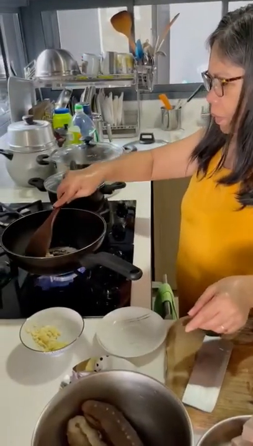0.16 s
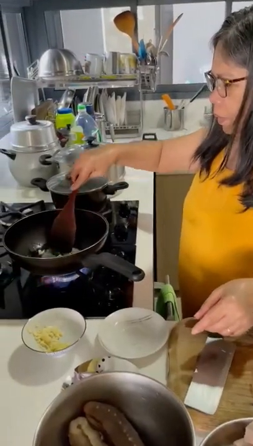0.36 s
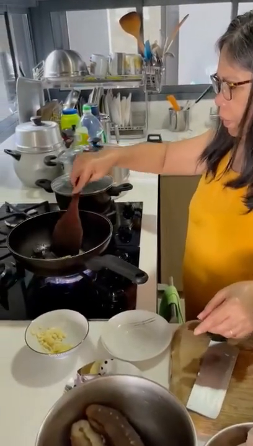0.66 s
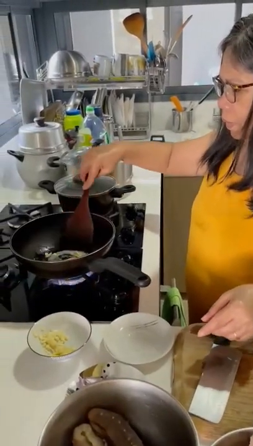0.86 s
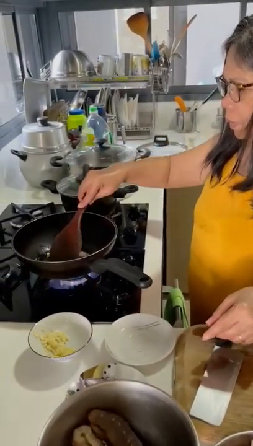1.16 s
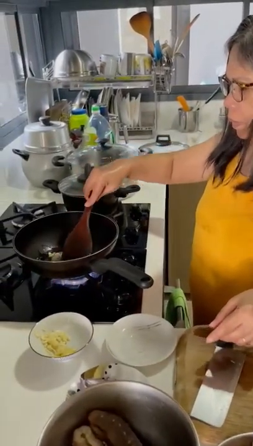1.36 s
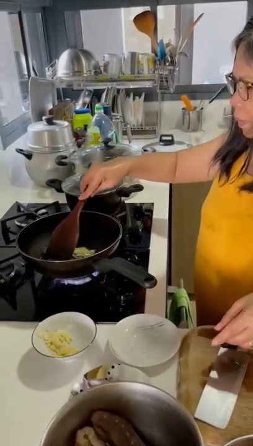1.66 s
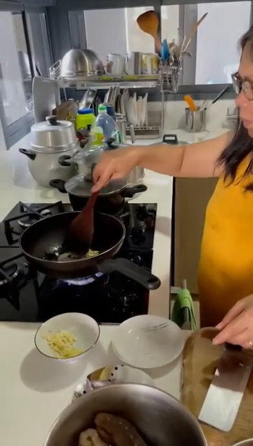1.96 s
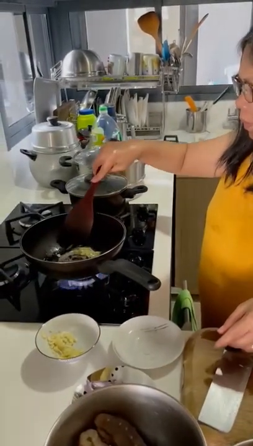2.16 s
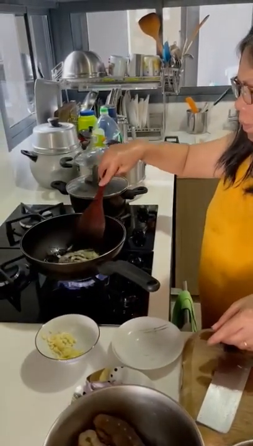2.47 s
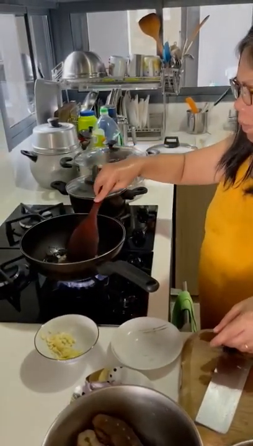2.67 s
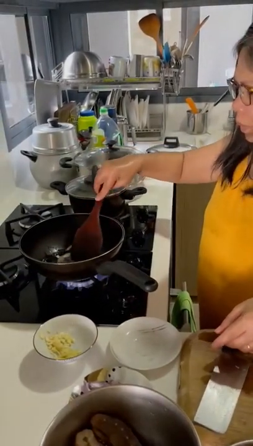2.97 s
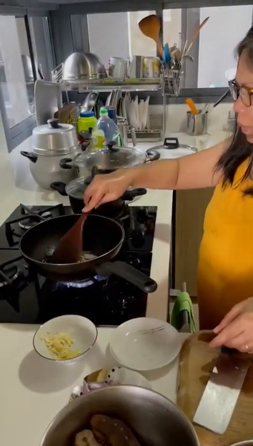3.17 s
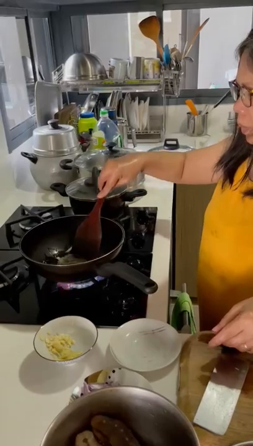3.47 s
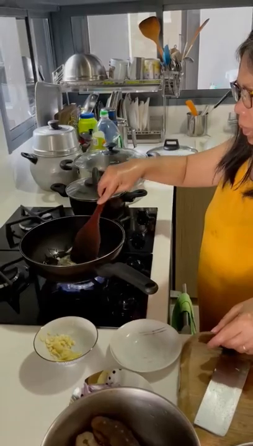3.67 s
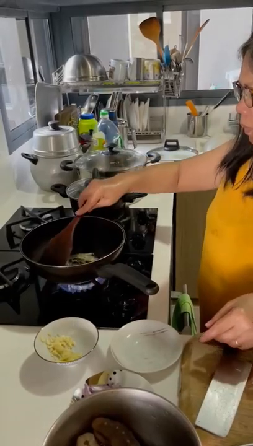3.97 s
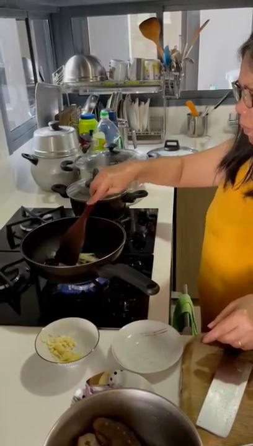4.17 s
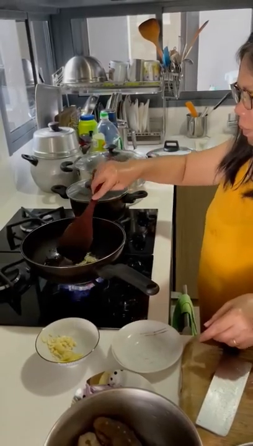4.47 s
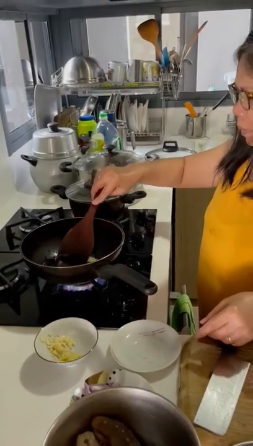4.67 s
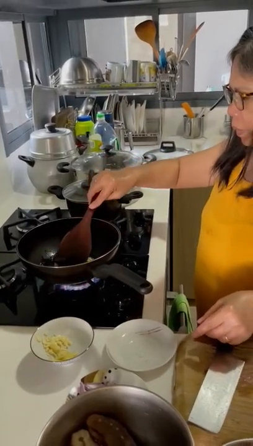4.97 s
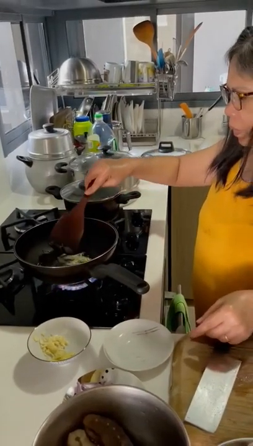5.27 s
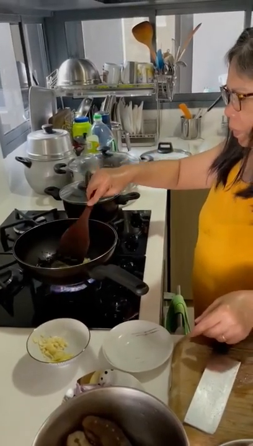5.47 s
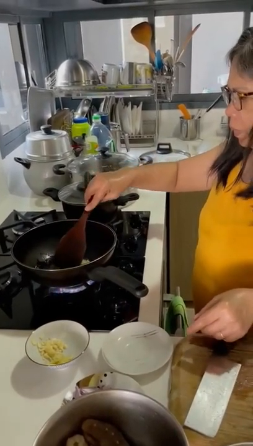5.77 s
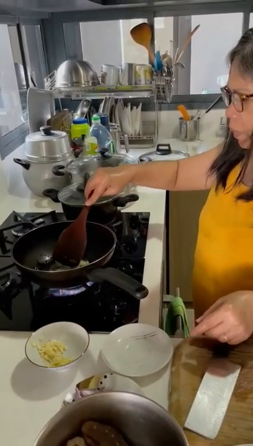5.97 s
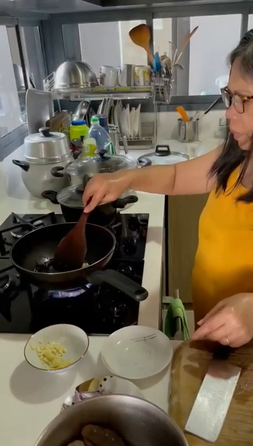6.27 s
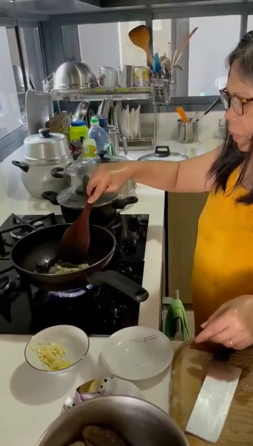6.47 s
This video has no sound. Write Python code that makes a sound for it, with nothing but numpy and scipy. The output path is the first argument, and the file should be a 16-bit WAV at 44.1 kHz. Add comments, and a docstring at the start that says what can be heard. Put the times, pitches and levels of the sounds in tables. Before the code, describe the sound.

In a hard-surfaced home kitchen, oil sizzles continuously, with fine bubbling pops and faint thin steam whistles. Irregular wooden clacks strike a pan, some sharp and light, others dull and heavy with a low thud on the grate. Brief rough scrapes follow the stirring. A quiet burner drone and moving air sit beneath, heard by a close two-channel microphone, ending on a short scrape as frying continues.

```python
"""Food fries gently in a pan on a gas hob from the start: bursting bubbles hiss, made of random clicks and noise.
A steady kitchen murmur and moving air on a nearby two-port microphone (coloured noise) lie under it.
Thin steam whistles soon join in. Then a wooden spatula knocks, taps and scrapes the pan, each contact
a noisy clack plus fading pan tones, with a short room echo. From 1.3 s dull low bumps come now and then.
The frying slowly grows louder and flares up at each turn of the food; a last scrape comes near the end."""
import sys
import numpy as np
from scipy import signal
from scipy.fft import rfft, irfft, next_fast_len
from scipy.io import wavfile

SR = 44100
rng = np.random.default_rng(int(sys.argv[2]) if len(sys.argv) > 2 else 0)


def dump(signal):
    """Clip the signal to [-1, 1] and save it as 16-bit WAV at the path in sys.argv[1]."""
    limited = np.clip(np.atleast_2d(signal).T, -1, 1)
    pcm = np.round(limited * 32767).astype(np.int16)
    wavfile.write(sys.argv[1], SR, pcm)


N = 291501
T = np.arange(N) / SR  # time of every sample (s)

# Turns of wet food onto hot metal. Each row: start in seconds, rise of the hiss in dB,
# drying time in seconds (the rise in dB shrinks to about a third in that time).
FOOD_TURNS = [(.03, 3, 0.12), (.37, 6.5, 0.43), (.8, 4, 0.11), (1.44, 4, 0.052), (1.7, 6.5, 0.065),
              (1.86, 4.5, 0.059), (2.14, 4.5, 0.22), (2.3, 4.5, 0.35), (2.8, 1, 0.067), (3.27, 0.5, 0.35),
              (3.53, 2, 0.6), (4.22, 3.5, .15), (5.36, 2.5, 0.068), (5.75, 2, .5), (6.42, 3, .3)]
# Colour of the bursting bubbles. Each row: frequency in Hz, level in dB per Hz.
OIL_COLOUR = [(200, -16), (600, -8.5), (1500, -8), (2400, -9), (3500, -7.3), (4150, -4.5), (4800, -9.5),
              (5700, -6), (7000, -5), (7900, -2.5), (9300, -2), (10600, .3), (11400, -1), (12500, -15)]
# Pan resonances that the bubbles keep ringing. Each row: frequency in Hz, width in Hz, level in dB.
OIL_RINGS = [(1315, 60, 0), (2315, 55, 8.5), (2450, 160, 7.5), (2790, 80, -1), (3100, 100, -3),
             (3870, 50, 3), (6095, 65, -2), (7774, 110, 2), (11130, 400, -5)]
# Level of that ringing against the hiss. Each row: time in seconds, level in dB.
RING_LEVEL = [(0, 4), (.5, 2), (1.12, 4), (1.4, 4.5), (1.58, 5), (2.03, 5.5), (2.17, 4), (2.3, 2),
              (2.55, 3), (3.05, 3), (3.25, 6), (3.6, 4), (4.3, -1), (4.45, 4), (4.68, 0.5), (5.2, 5),
              (5.7, 3), (6.61, 4.5)]
# Colour of the steady murmur of burner and fan. Each row: frequency in Hz, level in dB per Hz.
KITCHEN_COLOUR = [(30, -25.5), (70, -2), (120, 0.5), (190, -9), (280, -7), (365, -8), (480, -12),
                  (750, -10), (1500, -24.5), (5000, -80)]
# Strength of the air moving over the microphone. Each row: time in seconds, level in dB.
DRAUGHT_LEVEL = [(0.0, -39.5), (0.35, -53), (0.61, -44), (0.72, -47), (1.22, -42.5), (1.32, -35.5),
                 (1.42, -29.5), (1.5, -33), (1.6, -30), (1.65, -44), (1.72, -45), (2.25, -49.5),
                 (2.48, -42), (3.2, -59.5), (3.68, -47.5), (4.1, -48), (4.6, -40), (5.35, -37.5),
                 (6.1, -44), (6.3, -39.5), (6.61, -42)]
# Colour of that air. Each row: frequency in Hz, level in dB per Hz.
DRAUGHT_COLOUR = [(20, -32), (33, -11.5), (50, 0), (75, -2.5), (115, -7.5), (170, -20.5), (260, -31),
                  (500, -32.5), (1200, -89)]
# Thin whistles of steam. Each row: start in seconds, length in seconds, level in dB,
# first frequency in Hz, last frequency in Hz.
STEAM_WHISTLES = [(.05, .25, -56, 7900, 7900), (1.03, .27, -54, 7900, 7950), (2.12, .5, -50, 7950, 8700),
                  (2.72, .43, -52, 7900, 8400), (3.68, .3, -54, 8400, 8200), (4.12, .45, -51, 8200, 8400),
                  (4.68, .25, -56, 7950, 7900)]
# Spatula blows. Each row: start in seconds, level in dB, contact sharpness in Hz,
# place (0 base to 1 wall), weight of the arm in dB, note of the blade in Hz, that note's level against
# the pan in dB, how freely the pan rings in dB, tick of the blade's hard edge in dB.
SPATULA_BLOWS = [(0.141, -28.5, 900, 0.88, 13, 686, -9, -14, -40),
                 (0.5779, -22, 2000, 1, -10, 1760, -6.5, 5, -14.5),
                 (.865, -33, 5000, 0.64, -1.5, 1760, -7.5, -2.5, -4),
                 (.894, -41, 3000, 0.57, 4, 1400, -6, -2, -25),
                 (0.956, -44, 2200, 0.33, -4, 1380, 2, 7, -25),
                 (1.0393, -37, 2800, 0.31, 8, 2280, -1.5, -7, -18),
                 (1.775, -32, 1000, 1, 1.5, 694, -1.5, -5.5, -35),
                 (1.871, -30.5, 3170, 0.72, -6, 580, -6, -7.5, -13),
                 (2.219, -40.5, 1500, .11, 24, 360, -2.5, 4, -27),
                 (2.2804, -41, 2780, 0.53, -10, 2210, -4, -8, -20),
                 (2.55, -44, 1590, 0.37, -1, 390, 3.5, 1, -25),
                 (2.631, -39, 2500, 0.67, -5, 2400, 1, -5, -20),
                 (3.277, -29.5, 1610, 0.97, -3.5, 817, 0.5, 1.5, -20),
                 (3.3, -41, 1200, 0.43, 21, 794, 0, 1, -28), (3.636, -43.5, 900, .2, 20, 344, -3, 5, -18),
                 (3.991, -27, 900, 0.83, -4.5, 710, -8.5, -2, -29),
                 (4.1243, -39.5, 2000, 0.88, -11, 1910, -4, -2.5, -26),
                 (4.36, -39, 704, 0.45, 12, 360, -14, -1, -30),
                 (4.409, -26.5, 880, 0.86, -6.5, 364, -12, 0, -35),
                 (4.449, -46.5, 900, 0.67, 10, 706, -1, -2, -30),
                 (5.038, -31.5, 3640, 0.47, 0, 1380, -9, -2.5, -14),
                 (5.402, -33, 3000, 0.4, -3.5, 1380, -11, 1.5, -26),
                 (5.7644, -28, 3800, 0.35, -3.5, 3250, -7.5, 1, -24)]
# Tones (modes) of the pan. Each row: frequency in Hz, 60 dB fading time in seconds,
# level in dB when struck on the base, level in dB when struck on the wall.
PAN_MODES = [(141, 0.35, -3.5, 1), (199.4, 0.34, -14, -2), (285.5, 0.25, -8.5, -4.5),
             (363, 0.095, 1.5, 6.5), (563, 0.32, -5, -11.5), (688, 0.21, -11, 5.5), (735, 0.098, -7, 6.5),
             (776, 0.07, -3.5, 12.5), (816, 0.11, -8, -9.5), (936, 0.23, -11, -5), (1075, 0.016, -16, -5.5),
             (1271, 0.25, -6, -5), (1302, 0.26, 3, 0), (1394, .23, -1, -14), (1617, 0.22, 2.5, -4.5),
             (1792, 0.093, -4, -2), (1835, 0.051, -6, -5), (2174, 0.097, -9, -17), (2360, .18, -24, -22),
             (2500, 0.014, -9, 6.5), (3000, 0.015, 12, -2), (3070, 0.0093, -11, 13)]
# Dry clack of the wooden blade. Each row: frequency in Hz, level in dB on the base, level in dB on the wall.
BLADE_COLOUR = [(70, -16, -8.5), (144, 1.5, -2.5), (260, 1.5, -7.5), (360, -7, -6.5), (600, -13.5, -9.5),
                (740, -9, 0), (1120, -32, -4), (1400, -17, -4.5), (1920, -4.5, -9), (3000, -8.5, -12.5),
                (4900, -10.5, -13.5), (6400, 5.5, -12.5), (11800, -52, -92)]
# Tick of the blade's hard edge: rows of frequency in Hz and level in dB per Hz,
# then its 60 dB fading time in seconds.
TICK_COLOUR, TICK_T60_S = [(2500, 5), (5500, 23), (7000, 26), (11000, -33)], 0.11
# Thud of the pan on its grate. Each row: frequency in Hz, 60 dB fading time in seconds, level in dB.
GRATE_THUD = [(119, 0.23, -1.5), (199, 0.042, 4.5), (301, 0.042, -9), (368, 0.056, 5)]
# Strokes of the blade over the metal. Each row: start in seconds, length in seconds, level in dB,
# sharpness in Hz, place (0 base to 1 wall), weight in dB, blade resonance in Hz, its lift in dB.
SCRAPE_STROKES = [(.16, 0.14, -46.5, 700, 0.85, -9, 606, 8), (.4, 0.067, -57, 9000, .1, -25, 6160, 12),
                  (.592, 0.073, -43, 1600, 0.8, -1, 850, -4), (.9, 0.12, -46, 2280, 0.18, 2, 1370, 6),
                  (1.18, 0.085, -53.5, 3340, .17, -24, 3200, 17),
                  (1.49, 0.16, -48, 6900, 0.28, -12, 6000, -28), (1.784, 0.1, -45, 800, 0.67, -9, 650, 8),
                  (2.195, 0.051, -47.5, 3470, 0.15, -2, 900, 16),
                  (2.521, 0.05, -48, 2500, .17, 12, 400, -10), (3.615, 0.075, -53, 2600, 0.2, -7, 350, 1),
                  (4.018, 0.14, -50, 1100, 0.56, -10, 710, 6), (4.353, 0.057, -48, 603, .3, -14, 420, 5),
                  (4.425, .04, -46, 1400, 0.6, -6, 750, 10), (6.49, 0.06, -51, 7000, 0.15, -19, 3900, 21)]
# Upper bass that lingers between the kitchen walls. Each row: frequency in Hz, level in dB.
BOOM_COLOUR = [(60, -19.5), (120, 3.5), (200, -5.5), (260, -4.5), (365, -12), (520, -26), (1500, -61)]
# Dull low bumps. Each row: start in seconds, level in dB before the soft start and fade, frequency in Hz.
LOW_BUMPS = [(1.307, -22, 139), (1.338, -28.5, 282), (1.376, -5, 54), (1.377, -23, 193),
             (1.408, -6.5, 61.6), (1.418, -13, 178), (1.422, -22.5, 365), (1.542, -20, 61.6),
             (1.6, -10.5, 59), (2.364, -22.5, 111), (2.43, -27.5, 242), (2.438, -18.5, 75),
             (2.481, -23, 70), (2.573, -16.5, 127), (2.614, -24, 152), (5.327, -13, 82)]
# Phase by which the left port leads the right. Each row: frequency in Hz, phase in radians.
PORT_PHASE = [(0, 0), (1900, 0), (3000, .55), (4000, .6), (4400, 1.2), (4800, 3.14), (5400, 6.1),
              (6500, 6.35), (7600, 8.3), (8500, 9.4), (9700, 9.55), (10300, 10.4), (11000, 11.3),
              (11500, 12.15), (11900, 12.5)]

SIZZLE_DB, HEATING_DB_PER_S = -47.5, 0.947  # frying level at the start and its rise as the pan heats
FLARE_S = 0.097  # how fast the hiss flares up after a turn
RING_WAVER_DB, FLICKER_DB = 2.4, 0.7  # unsteadiness of the pan's ring and of the upper hiss
SCATTER_DB, DETUNE = 1.5, 0.006  # typical change of a mode between contacts: level, share of its pitch
PAIR_SPLIT = 0.018  # the pan is not quite round: largest gap between paired tones, as a share of pitch
TOK_T60_S = 0.027  # the wood's own note dies this fast
THUD_DB, THUD_LAG_S = -11, 0.00683  # thud after a knock on the wall: level there and delay
REBOUND_S, REBOUND_DB = 0.0103, -8  # bounce off the wall: delay, and level there before it is softened
BLADE_Q = 14  # narrowness of the blade's resonance (no unit)
ROOM_T60_S = 0.46
LOW_CUT_HZ, TOP_HZ = 43.5, 11700


def undb(db):
    """Decibels to gain."""
    return 10 ** (np.asarray(db) / 20)


def unit(x):
    """Scale to rms 1."""
    return x / np.sqrt(np.mean(x ** 2))


def opening(x):
    """Scale to a spread of 1 over the first 20 ms."""
    return x / np.std(x[:SR // 50])


def curve(rows):
    """Join (seconds, value) rows by straight lines."""
    return np.interp(T, *np.transpose(rows))


def fade(t, t60):
    """Exponential decay that loses 60 dB in t60 seconds."""
    return np.exp(-np.log(1000) * t / t60)


def waver(per_s):
    """Smooth random wandering with rms 1."""
    count = int(N / SR * per_s) + 2
    return unit(np.interp(T * per_s, np.arange(count), rng.standard_normal(count)))


def colour(x, points):
    """Filter through (Hz, dB) points without any sound before its cause, built from the cepstrum."""
    size = 2 * next_fast_len(x.shape[-1], True)
    hz, db = np.transpose(points)
    log_hz = np.log(np.fft.rfftfreq(size, 1 / SR) + 1)
    gain = undb(np.interp(log_hz, np.log(hz), db))
    cepstrum = irfft(np.log(gain))
    # fold the second half onto the first, so the filter only looks back in time
    cepstrum[1:size // 2] *= 2
    cepstrum[size // 2 + 1:] = 0
    response = np.exp(rfft(cepstrum))
    return irfft(rfft(x, size) * response)[..., :x.shape[-1]]


def respond(x, response):
    """Filter by a response given as a function of Hz."""
    size = 2 * next_fast_len(N, True)
    return irfft(rfft(x, size) * response(np.fft.rfftfreq(size, 1 / SR)))[..., :N]


def soften(x, hz):
    """Cut the treble above hz, as a longer contact does."""
    return signal.sosfilt(signal.butter(2, min(hz, SR / 3), fs=SR, output="sos"), x)


def add(track, s, x):
    """Mix x into the track at time s."""
    start = max(int(s * SR), 0)
    track[start:start + len(x)] += x[:N - start]


def clicks(count, per_s, spread_db):
    """Clicks at random moments with random strengths; a larger spread makes a few stand out."""
    hit = rng.random(count) < per_s / SR
    extra_db = spread_db * np.minimum(rng.exponential(size=count), 5)
    return hit * rng.standard_normal(count) * undb(extra_db)


def sizzle_level():
    """Level of the frying in dB: it climbs with the pan's heat and flares at each turn of the food."""
    db = SIZZLE_DB + HEATING_DB_PER_S * T
    for s, rise_db, drying_s in FOOD_TURNS:
        age = T - s
        flare = np.clip(age / FLARE_S, 0, 1)
        drying = np.exp(-np.maximum(age - FLARE_S, 0) / drying_s)
        db = db + rise_db * flare * drying
    return db


def bubbles(fizz_db=-1, spit_db=-12):
    """Bursting bubbles are dense clicks and fizz with a few spits; ringing pan resonances waver gently."""
    pops = unit(clicks(N, per_s=5000, spread_db=1.0))
    fizz = undb(fizz_db) * rng.standard_normal(N)
    spits = unit(clicks(N, per_s=120, spread_db=2.5))
    sound = unit(pops + fizz) + undb(spit_db) * spits
    swell_db = curve(RING_LEVEL)
    for hz, width, db in OIL_RINGS:
        ring = signal.lfilter(*signal.iirpeak(hz, hz / width, fs=SR), rng.standard_normal(N))
        sound = sound + ring * undb(db + swell_db + RING_WAVER_DB * waver(per_s=10))
    return colour(sound, OIL_COLOUR)


def frying(diffuse_db=-18.0, ring_follow=0.036):
    """The upper hiss swells as food is turned, the lower part much less; some arrives from all round."""
    # separate bubbles in each channel make the part that comes from all round the room
    diffuse = colour(np.array([bubbles(), bubbles()]),
                     [(1500, -49.5), (2400, 9.5), (4500, 2.5), (6000, -70), (8500, -65), (11300, -19)])
    sound = unit(bubbles() + undb(diffuse_db) * diffuse)
    low = respond(sound, lambda hz: 1 / (1 + (hz / 4500) ** 6))
    high = sound - low
    db = sizzle_level()
    low_db = db.mean() + ring_follow * (db - db.mean())
    return undb(db + FLICKER_DB * waver(per_s=14)) * high + undb(low_db) * low


def kitchen_murmur(level_db=-53.0):
    """Burner and fan make steady coloured noise; standing waves make its bass differ between the ports."""
    mid, side = colour(rng.standard_normal((2, N)), KITCHEN_COLOUR)
    side = colour(side, [(60, -8), (130, 4.5), (220, 0.5), (400, -7.0), (1000, -5.5)])
    return undb(level_db) * np.array([mid + side, mid - side]) / np.std(mid)


def draught(eddy_db=3.5, eddies_per_s=12, side_db=-13):
    """Eddying air rumbles on the microphone: deep noise of wandering level, largely alike at both ports."""
    mid, side = unit(colour(rng.standard_normal((2, N)), DRAUGHT_COLOUR))
    noise = mid + undb(side_db) * side * np.array([[1], [-1]])
    return noise * undb(curve(DRAUGHT_LEVEL) + eddy_db * waver(eddies_per_s))


def whistles(width_hz=160):
    """Steam squeezes out of the food: an unsteady narrow hiss that glides as the steam's gap changes."""
    out = np.zeros(N)
    for s, length, db, first_hz, last_hz in STEAM_WHISTLES:
        count = int(length * SR)
        glide_hz = np.linspace(first_hz, last_hz, count)
        turn = np.exp(2j * np.pi * np.cumsum(glide_hz) / SR)
        flutter = soften(rng.standard_normal(count) + 1j * rng.standard_normal(count), width_hz)
        hiss = unit(np.real(turn * flutter))
        add(out, s, undb(db) * hiss * signal.windows.tukey(count, .8))
    return out


def pan_ring(t, wall, travel_s=0.001095):
    """The pan rings in many fading tones, each a close pair that beats; the place struck sets their levels."""
    ring = 0
    for hz, t60, base_db, wall_db in PAN_MODES:
        db = base_db + wall * (wall_db - base_db) + SCATTER_DB * rng.standard_normal()
        # blade and food load the pan differently each time
        pitch = hz * (1 + DETUNE * rng.standard_normal())
        # low bending waves reach the rim later; travel_s is the delay at 1000 Hz
        age = np.maximum(t - travel_s * 1000 / hz, 0)
        beat = np.cos(np.pi * PAIR_SPLIT * rng.random() * pitch * age)
        ring = ring + undb(db) * np.sin(2 * np.pi * pitch * age) * beat * fade(age, t60)
    # the blade stays on the metal and soaks up part of the ring
    return ring * (0.2 + fade(t, t60=0.52))


def blade_clack(t, wall, clack_t60, snap_db=-8.5, snap_t60=0.018):
    """The wooden edge snaps down, then chatters: two fading noises coloured by the place struck."""
    snap = unit(rng.standard_normal(len(t)) * fade(t, snap_t60))
    chatter = unit(rng.standard_normal(len(t)) * fade(t, clack_t60))
    place_colour = [(hz, base_db + wall * (wall_db - base_db)) for hz, base_db, wall_db in BLADE_COLOUR]
    return colour(undb(snap_db) * snap + chatter, place_colour)


def pan_response(wall, weight_db, ring_db, clack_t60=0.14):
    """One contact sounds the blade's clack and the pan's ring; a heavier push brings more bass."""
    t = T[:SR // 2]
    wall = np.clip(wall, 0, 1)
    contact = unit(blade_clack(t, wall, clack_t60)) + undb(ring_db) * unit(pan_ring(t, wall))
    # a light flick hardly moves the pan as a whole; a heavy push does
    return colour(contact, [(450, weight_db), (1600, weight_db / 2), (2250, 0.082)])


def rattle(wall, after_db=-13, t60=0.43):
    """The blow, a bounce that grows toward the wall, then small rebounds as the pan settles on its grate."""
    t = T[:SR // 4]
    bounce = undb(REBOUND_DB) * wall ** 2 * (np.arange(len(t)) == int(REBOUND_S * SR))
    rebounds = clicks(len(t), per_s=590, spread_db=0.0) * fade(t, t60) * np.minimum(t / 0.0011, 1)
    return (t == 0) + soften(bounce, hz=1100) + undb(after_db) * rebounds / np.linalg.norm(rebounds)


def thud():
    """The pan rocks against its grate just after a knock, in a few low fading tones."""
    age = np.maximum(T[:SR // 2] - THUD_LAG_S, 0)
    out = 0
    for hz, t60, db in GRATE_THUD:
        gain = undb(db + SCATTER_DB * rng.standard_normal())
        out = out + gain * np.sin(2 * np.pi * hz * age) * fade(age, t60)
    return out


def blows():
    """Knocks and taps: the edge ticks, the wood says a short tok, the pan answers and thuds on its grate."""
    out, t = np.zeros(N), T[:SR // 2]
    for s, db, sharp_hz, wall, weight_db, blade_hz, tok_db, ring_db, tick_db in SPATULA_BLOWS:
        contacts = signal.fftconvolve(pan_response(wall, weight_db, ring_db), rattle(wall))
        body = soften(contacts, sharp_hz)[:len(t)]
        tok = np.sin(2 * np.pi * blade_hz * t) * fade(t, TOK_T60_S)
        tick = colour(rng.standard_normal(len(t)) * fade(t, TICK_T60_S), TICK_COLOUR)
        rocking = undb(THUD_DB) * wall ** 2 * opening(thud())
        blow = opening(body) + rocking
        blow = blow + undb(tok_db) * opening(tok) + undb(tick_db) * opening(tick)
        # the level is that of everything together over the first 20 ms
        add(out, s, undb(db) * opening(blow))
    return out


def blade_resonance(x, hz, lift_db):
    """The angle of the blade and the grip on it raise or lower one resonance band."""
    band = signal.lfilter(*signal.iirpeak(hz, BLADE_Q, fs=SR), x)
    return x + (undb(lift_db) - 1) * band


def scrapes():
    """The oiled blade sticks and slips in tiny uneven steps that sound through the pan."""
    out = np.zeros(N)
    for s, length, db, sharp_hz, wall, weight_db, blade_hz, lift_db in SCRAPE_STROKES:
        count = int(length * SR)
        slips = clicks(count, per_s=320, spread_db=2.5) * signal.windows.tukey(count, .5)
        step = pan_response(wall, weight_db, ring_db=-5.5, clack_t60=0.1)
        stroke = soften(signal.fftconvolve(slips, step), sharp_hz)
        stroke = blade_resonance(stroke, blade_hz, lift_db)
        add(out, s, undb(db) * stroke / np.std(stroke[:count]))
    return out


def room(x, wet_db=-10.5, side_db=-6, build_s=0.001, damp_hz=6000,
         boom_db=-5, boom_t60=1.0, boom_build_s=0.0083, boom_side_db=-1):
    """Tiles and windows return a short dense tail; the bass builds later and stays longer."""
    t = T[:SR // 2]
    bright = soften(rng.standard_normal((2, len(t))), damp_hz)
    bright = bright * fade(t, ROOM_T60_S) * (1 - np.exp(-t / build_s))
    bright = bright / np.sqrt(np.sum(bright[0] ** 2) * SR / (2 * damp_hz))
    boom = rng.standard_normal((2, len(t))) * fade(t, boom_t60) * (1 - np.exp(-t / boom_build_s))
    boom = colour(boom / np.linalg.norm(boom[0]), BOOM_COLOUR)
    mid = undb(wet_db) * bright[0] + undb(boom_db) * boom[0]
    side = undb(wet_db + side_db) * bright[1] + undb(boom_db + boom_side_db) * boom[1]
    tail = mid + side * np.array([[1], [-1]])
    return x + signal.fftconvolve(x[None], tail, axes=1)[:, :N]


def bumps(bump_t60=0.038, push_s=0.0035):
    """Dull low bumps: deep tones that start softly and die at once."""
    out, t = np.zeros(N), T[:SR // 4]
    for s, db, hz in LOW_BUMPS:
        tone = np.sin(2 * np.pi * hz * t)
        add(out, s, undb(db) * tone * fade(t, bump_t60) * (1 - np.exp(-t / push_s)))
    return out


def scene():
    """All sounds together; only the spatula's sounds get the room's echo."""
    background = frying() + kitchen_murmur() + draught()
    return background + whistles() + room(blows() + scrapes()) + bumps()


def record(dry):
    """The left port is louder around 700 Hz, the ports part in treble phase; deepest bass and top are cut."""
    left = colour(dry[0], [(350, 0), (700, 1.3), (1400, 0)])
    right = colour(dry[1], [(350, 0), (700, -1), (1400, 0)])
    right = respond(right, lambda hz: np.exp(-1j * np.interp(hz, *np.transpose(PORT_PHASE))))
    low_cut = signal.butter(3, LOW_CUT_HZ, "highpass", fs=SR, output="sos")
    both = signal.sosfilt(low_cut, np.array([left, right]))
    return signal.sosfilt(signal.ellip(12, .2, 80, TOP_HZ, fs=SR, output="sos"), both)


dry = scene()
out = record(dry)
dump(out)
```